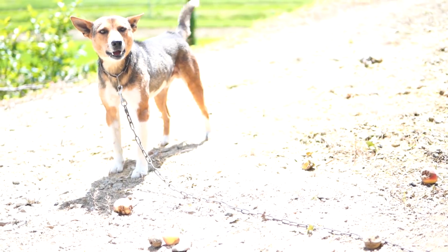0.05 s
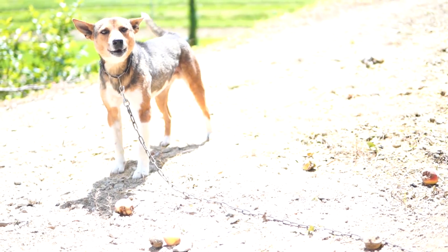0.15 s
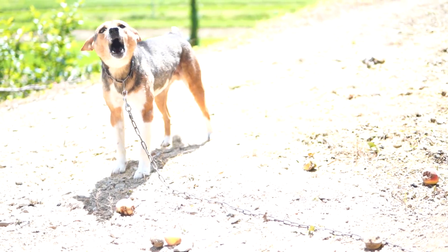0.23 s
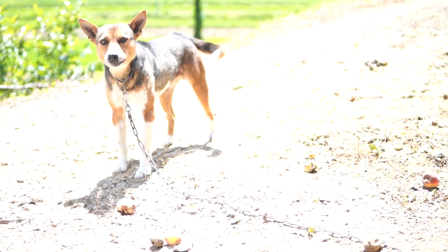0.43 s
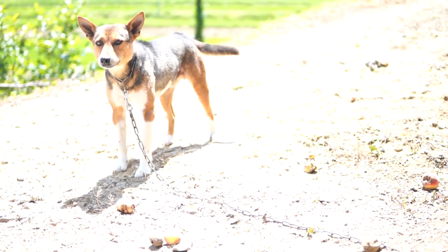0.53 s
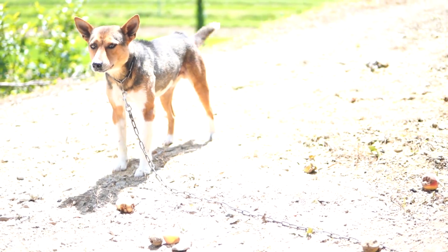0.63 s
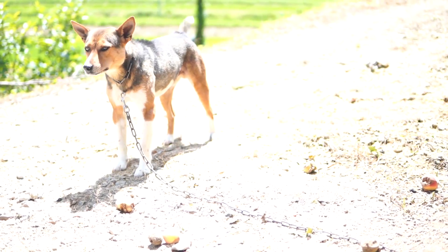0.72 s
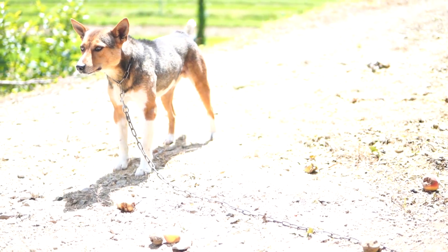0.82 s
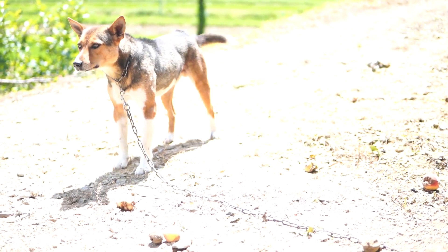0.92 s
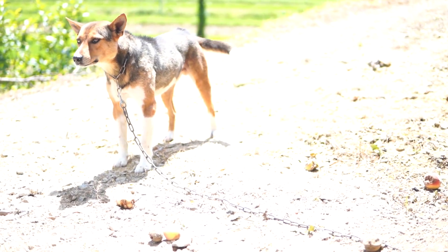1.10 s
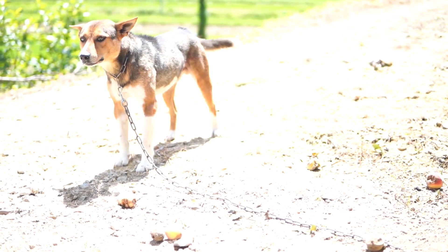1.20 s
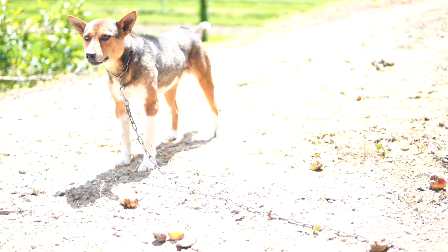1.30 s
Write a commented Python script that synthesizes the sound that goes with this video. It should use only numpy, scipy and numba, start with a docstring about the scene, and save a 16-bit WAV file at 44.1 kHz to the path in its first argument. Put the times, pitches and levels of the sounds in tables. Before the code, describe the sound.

A dog gives one short yelping bark outdoors, hoarse at both ends, over quiet air

```python
"""A small dog gives one yelping bark in an open yard, a few metres away, over quiet air and a low sway of wind.
The bark starts hoarse, clears as the pitch arches up, breaks again as it falls and ends in a huff of air.
The voice is a train of pulses ringing through throat, jaw and muzzle resonances; the huff is sputtering noise.
The yard adds a ground bounce, treble scatter and two fading echoes; shaped noise makes the outdoor bed."""
import sys
import numpy as np
from scipy import signal
from scipy.fft import rfft, irfft
from scipy.io import wavfile
from numba import njit

SR = 44100
rng = np.random.default_rng(int(sys.argv[2]) if len(sys.argv) > 2 else 0)


def unload_wav(signal):
    """Save mono or channel-first audio to the path in sys.argv[1] as 16-bit WAV at rate SR, clipped to [-1, 1]."""
    wavfile.write(
        sys.argv[1],
        SR,
        np.round(np.clip(np.atleast_2d(signal).T, -1, 1) * 32767).astype(np.int16),
    )


N = 59535
TOP_HZ = 15700  # upper limit of the voice's harmonics and of the final mix


def undb(db):
    """Decibels to gain."""
    return 10 ** (np.asarray(db) / 20)


def unit(x):
    """Scale to rms 1."""
    return x / np.sqrt(np.mean(x ** 2))


def curve(table):
    """Each column after the time, joined by straight lines."""
    rows = np.array(table, float)
    t = np.arange(N) / SR
    return [np.interp(t, rows[:, 0], column) for column in rows.T[1:]]


@njit
def svf(x, hz, width):
    """Band-pass with a moving centre, gain 1 there."""
    y = np.empty(len(x))
    band, low = 0., 0.
    for i in range(len(x)):
        g = np.tan(np.pi * hz[i] / SR)
        damping = width / hz[i]
        # the tiny offset keeps the filter clear of vanishingly small numbers
        v = (band + g * (x[i] + 1e-18 - low)) / (1 + g * (g + damping))
        band = 2 * v - band
        low = low + 2 * g * v
        y[i] = damping * v
    return y


def resonate(x, hz, width, order=4):
    """A steep resonance: the band-pass applied several times, each pass with the given width."""
    centre = np.minimum(hz * np.ones(N), .45 * SR)
    for _ in range(order):
        x = svf(x, centre, float(width))
    return x


def bank(x, modes):
    """Resonances side by side."""
    return sum(undb(db) * resonate(x, hz, width) for hz, width, db in modes)


def noise():
    """White noise."""
    return rng.standard_normal(N)


def colour(x, points):
    """Shape a spectrum by (Hz, dB) points, joined on a logarithmic frequency scale."""
    hz, db = np.array(points, float).T
    bins = np.maximum(np.fft.rfftfreq(N, 1 / SR), 1)
    gain = undb(np.interp(np.log(bins), np.log(hz), db))
    return irfft(rfft(x) * gain, N)


def flutter(hz):
    """Random wavering, low-passed at a given rate, spread 1."""
    return unit(signal.sosfilt(signal.butter(2, hz, fs=SR, output="sos"), noise()))


def treble(x, hz):
    """High-pass."""
    return signal.sosfilt(signal.butter(2, hz, "high", fs=SR, output="sos"), x)


def swells(table):
    """Bell-shaped envelopes, one for each row."""
    t = np.arange(N) / SR
    return sum(undb(db) * np.exp(-.5 * ((t - at) / length) ** 2) for at, db, length in table)


def outdoors():
    """Shaped noise: a gently wavering hiss, a distant rumble and the slow sway of air on the microphone."""
    # spectrum of the outdoor air: f/Hz, relative level/dB
    air_colour = [(94, -17.5), (160, -4.5), (301, -5), (401, -4), (441, -5.5), (485, -8.5), (566, -8),
                  (672, -4), (967, -14), (1820, -13.5), (5950, -20.5), (13300, -38), (15500, -46)]
    # spectrum of wind pressing on the microphone: f/Hz, relative level/dB
    sway_colour = [(2, -25.5), (7, -6), (11, 1.5), (16, -6.5), (25, -28.5), (60, -40), (300, -69),
                   (2000, -110)]
    air_db, rumble_db, sway_db = -58.5, -59.5, -42
    air_level = undb(air_db + .5 * flutter(1.9))
    air = unit(colour(noise(), air_colour)) * air_level
    rumble = unit(resonate(noise(), 106, 110)) * undb(rumble_db)
    sway = unit(colour(noise(), sway_colour)) * undb(sway_db)
    return air + rumble + sway


def earlier_echo():
    """The echo of an earlier bark dies away: resonant noise losing level at a steady rate in dB."""
    # resonances left in the echo: f/Hz, width of each pass/Hz, relative level/dB
    linger_modes = [(806, 470, 0), (1200, 140, 0), (2050, 700, -11), (3100, 500, -9), (4380, 350, -14)]
    start_db, fall_db_per_s = -57.5, 28
    t = np.arange(N) / SR
    return unit(bank(noise(), linger_modes)) * undb(start_db - fall_db_per_s * t)


def yard(x):
    """A bounce and treble scatter off the ground, quick echoes from bushes and a long faint one."""
    # spectrum of the noise in both echo tails: f/Hz, relative level/dB
    echo_colour = [(100, -6.5), (450, -4.5), (750, -1), (1400, -12.5), (2500, -13), (5500, -22.5),
                   (9000, -26), (15000, -36.5)]
    near_db, near_t60_s = -30.5, 0.1
    far_db, far_t60_s = -39.5, 1.5
    scatter_db, scatter_t60_s, scatter_hz = -7.5, .018, 3000
    ground_db, ground_s = -19.5, 0.0019
    t = np.arange(N) / SR

    def fade(t60):
        """Fall by 60 dB in the time t60."""
        return undb(-60 * t / t60)

    def tail(t60):
        """Fading noise, scaled to a mean gain of 1 between 500 and 1000 Hz."""
        echo = colour(noise(), echo_colour) * fade(t60)
        voice_band = abs(rfft(echo, SR)[500:1000])
        return echo / np.sqrt(np.mean(voice_band ** 2))

    # dividing by sqrt(N) gives the burst a total energy of 1
    scatter = unit(treble(noise() * fade(scatter_t60_s), scatter_hz)) / np.sqrt(N)
    response = undb(near_db) * tail(near_t60_s) + undb(far_db) * tail(far_t60_s)
    response = response + undb(scatter_db) * scatter
    ground = undb(ground_db) * np.interp(t - ground_s, t, x)
    return x + ground + signal.fftconvolve(x, response)[:N]


def tick():
    """A brief high tick just before the bark, perhaps the lips parting: resonant noise in a short bell."""
    # the tick's envelope: centre t/s, level/dB, bell length/s
    tick_times = [(.203, -54, 0.0012)]
    return unit(resonate(noise(), 4900, 3500)) * swells(tick_times)


def huff():
    """Air sputters through the dog's mouth, most as the voice gives out: unsteady noise rings the mouth."""
    # air through the open mouth: t/s, level/dB
    huff_level = [(.205, -97), (.222, -36), (.255, -21), (.285, -51), (.335, -47), (.362, -68), (.383, -19),
                  (.400, -31.5), (.415, -34.5), (.445, -40), (.475, -53.5), (.50, -54), (.53, -100)]
    # resonances of that air: f/Hz, width of each pass/Hz, relative level/dB
    huff_modes = [(392, 960, -10.5), (777, 330, 6.5), (1326, 410, -4.5), (2040, 750, -9), (3184, 570, -7.5),
                  (4446, 670, -11), (5380, 500, -12), (6250, 1900, -19.5), (7900, 1600, -27.5),
                  (10360, 4300, -29.5)]
    sputter_db, sputter_hz = 1.5, 140
    db, = curve(huff_level)
    sputter = noise() * undb(sputter_db * flutter(sputter_hz))
    return unit(bank(sputter, huff_modes)) * undb(db)


def voice():
    """Fold pulses ring the throat; when hoarse they waver in period and size and fall into twos and threes."""
    # pitch of the vocal folds: t/s, f/Hz
    fold_pitch = [(.208, 171.3), (.219, 383.8), (.232, 420.7), (.238, 486.7), (.243, 546.7), (.248, 624),
                  (.258, 642.2), (.270, 687.1), (.281, 699.6), (.291, 741.6), (.304, 773), (.316, 777.2),
                  (.328, 764.5), (.340, 726.5), (.352, 680), (.362, 595.4), (.372, 573.8), (.378, 419.8),
                  (.388, 371.8), (.402, 158.1), (.42, 93.9), (.47, 84)]
    # push of the bark: t/s, relative level/dB, throat ring level/dB, muzzle ring level/dB
    effort = [(.208, -62.5, -19.5, -23.5), (.220, -14, -21, -19.5), (.231, 2, -19.5, -20.5),
              (.242, 0, -12, -24.5), (.256, -1, -5, -17), (.265, -2, -14.5, -18.5), (.274, 3.5, -12.5, -11),
              (.282, -4.5, -3, 0), (.291, 1, -4.5, 4), (.316, 2, -2.5, -3), (.330, 0, -3, -6.5),
              (.342, -0.5, 0.5, 3), (.351, 5, -3, -16), (.358, 1, -15, -31.5), (.366, -5.5, -9, -17),
              (.375, -5, -15, -9), (.384, -8, -8, -6), (.391, -26.5, 6, -6), (.404, -38.5, 16, -14.5),
              (.42, -73.5, -19, 9)]
    # hoarseness: t/s, roughness (0-1)
    roughness = [(.22, 0.35), (.234, .4), (.244, .9), (.266, 0.8), (.275, 0.37), (.288, .06), (.345, .05),
                 (.354, .08), (.360, 0.4), (.372, 0.3), (.384, 1)]
    # the jaw moves the second resonance: t/s, f/Hz, relative level/dB
    jaw = [(.22, 830, -5.5), (.231, 852.4, -2), (.240, 990, 3.5), (.25, 1110, -1.5), (.263, 1170, 0),
           (.276, 1370, 0), (.292, 1300, -11.5), (.335, 1280, -18.5), (.354, 1244, -15.5),
           (.364, 1090, -3.5), (.386, 1150, -21)]
    # upper throat resonances: f/Hz, width of each pass/Hz, relative level/dB
    throat_modes = [(1952, 740, -15), (3015, 550, -15.5), (4153, 380, -19)]
    # muzzle resonances: f/Hz, width of each pass/Hz, relative level/dB
    muzzle_modes = [(4678, 300, -14.5), (5195, 660, -11), (5974, 920, -13.5), (7000, 260, -30),
                    (8430, 900, -32.5), (11100, 1600, -36.5), (13800, 2400, -44)]
    # low grunt of the slack folds, strongest before and after the yelp: t/s, relative level/dB
    grunt_level = [(.205, -75), (.215, -38.5), (.222, -24), (.234, -24.5), (.245, -51), (.36, -61),
                   (.380, -34.5), (.395, -46.5), (.43, -47), (.46, -49.5), (.49, -79)]
    # colour of the air let through by each pulse: f/Hz, relative level/dB
    breath_colour = [(1500, -39.5), (4000, -8), (6400, 1), (7600, -5.5), (8400, -1.5), (9600, -4),
                     (11300, -6.5), (12600, -14.5), (15600, -13.5)]
    first_hz, first_width_hz, jaw_width_hz = 730.6, 530, 330  # widths are for each pass
    voice_db, breath_db = -7.5, -36.5
    hoarse_gain_db = 0.5  # lift into the first resonance at full roughness
    # waver at full roughness, as fractions of pitch and of pulse size
    jitter, jitter_hz, shimmer, shimmer_hz = 0.087, 440.9, 0.58, 303.4
    half_tone, third_tone = .55, 0.64  # depth of patterns repeating every second and third pulse
    clear_breath = .35  # share of breath with no roughness; roughness adds to it

    hz, = curve(fold_pitch)
    db, throat_db, muzzle_db = curve(effort)
    rough, = curve(roughness)
    jaw_hz, jaw_db = curve(jaw)
    grunt_db, = curve(grunt_level)

    wavering_hz = hz * (1 + jitter * rough * flutter(jitter_hz))
    phase = 2 * np.pi * np.cumsum(wavering_hz) / SR
    pulses = sum(np.cos(k * phase) * (k * hz < TOP_HZ) for k in range(1, 60))
    twos = half_tone * np.cos(phase / 2)
    threes = third_tone * np.cos(phase / 3)
    size = 1 + rough * (shimmer * flutter(shimmer_hz) + twos + threes)
    push = size * undb(db + voice_db)
    folds = pulses * push

    puffs = (1 + np.cos(phase)) * push * (clear_breath + rough)
    breath = undb(breath_db) * unit(colour(noise(), breath_colour)) * puffs
    first = resonate(folds * undb(hoarse_gain_db * rough), first_hz, first_width_hz)
    second = resonate(folds * undb(jaw_db), jaw_hz, jaw_width_hz)
    throat = bank(folds * undb(throat_db), throat_modes)
    muzzle = bank(folds * undb(muzzle_db), muzzle_modes)
    grunt = np.sin(phase) * size * undb(grunt_db)
    return first + second + grunt + breath + throat + muzzle


def scene():
    """The dog in its yard, with the outdoor bed beneath."""
    bark = voice() + huff() + tick()
    return (yard(bark) + earlier_echo() + outdoors())[None]


def record(dry):
    """Round the highest peaks towards a ceiling of 0.9, then cut the top steeply."""
    rounded = dry / (1 + (dry / .9) ** 8) ** (1 / 8)
    low_pass = signal.ellip(10, .1, 80, TOP_HZ, fs=SR, output="sos")
    return signal.sosfilt(low_pass, rounded)


dry = scene()
out = record(dry)
unload_wav(out)
```